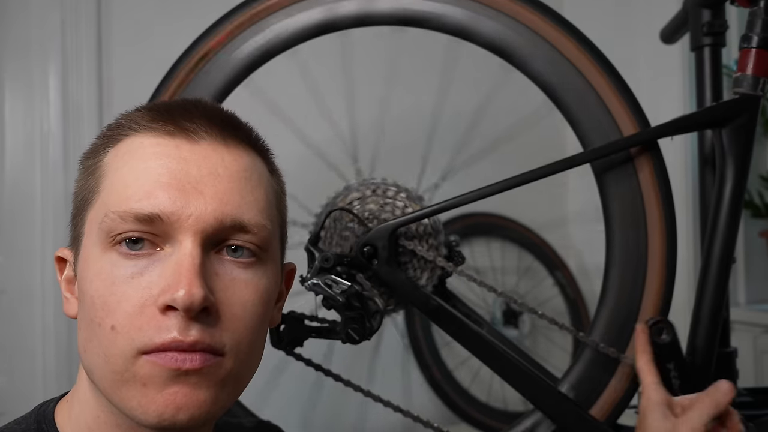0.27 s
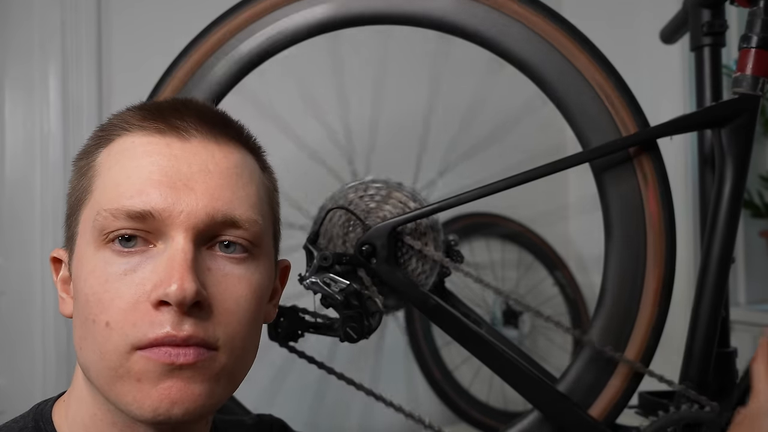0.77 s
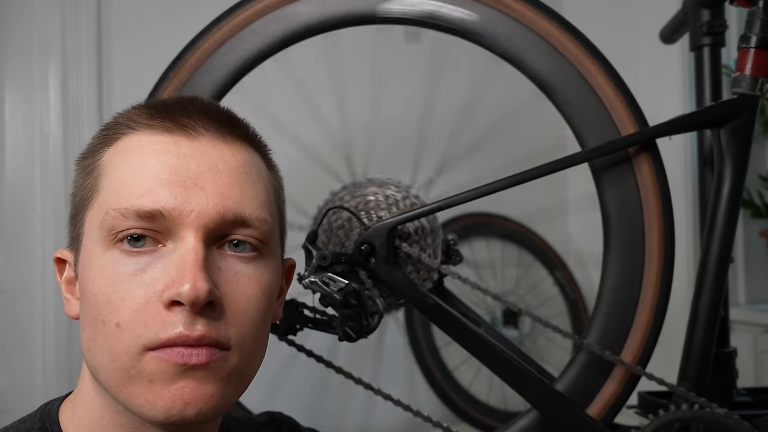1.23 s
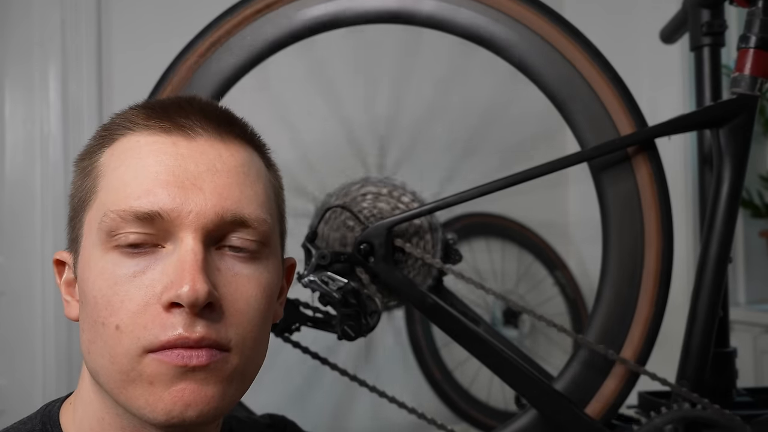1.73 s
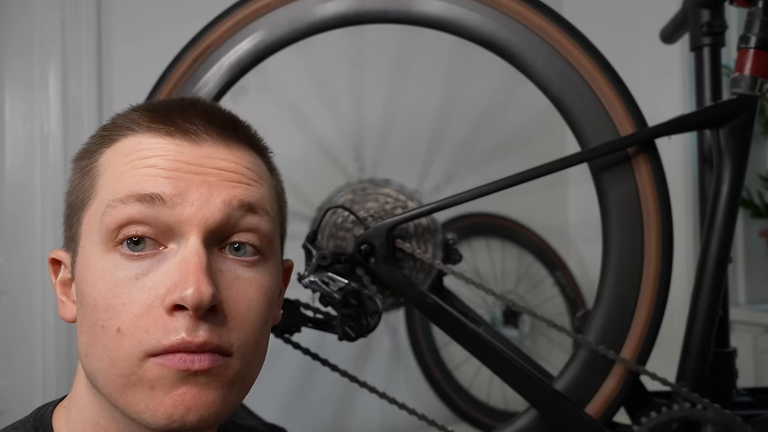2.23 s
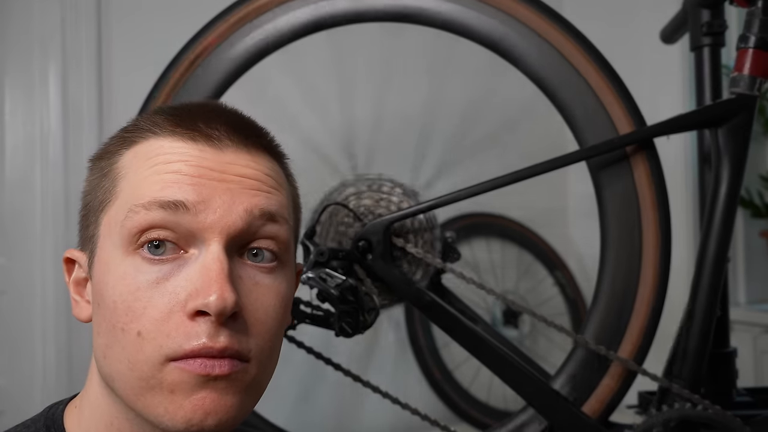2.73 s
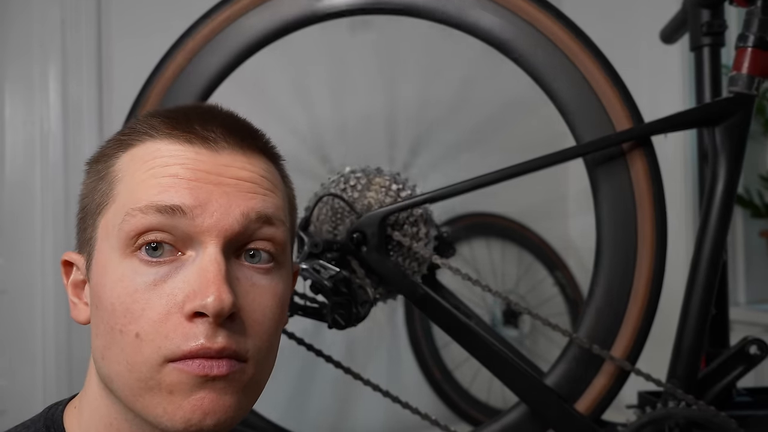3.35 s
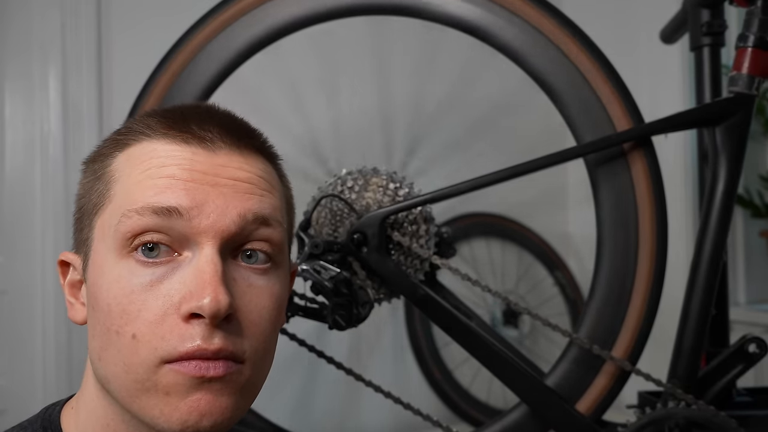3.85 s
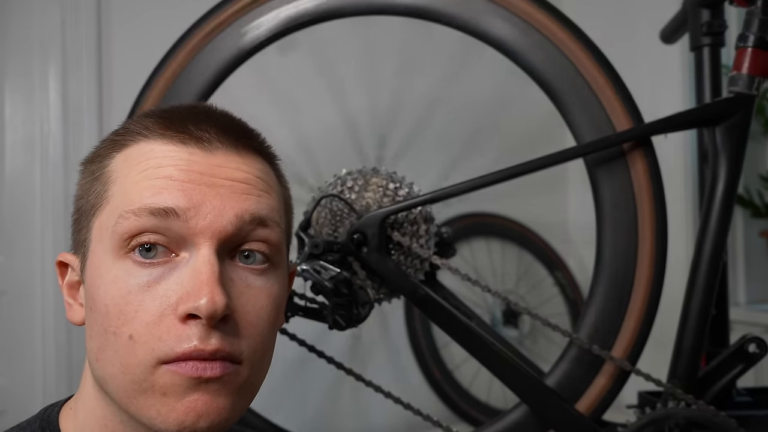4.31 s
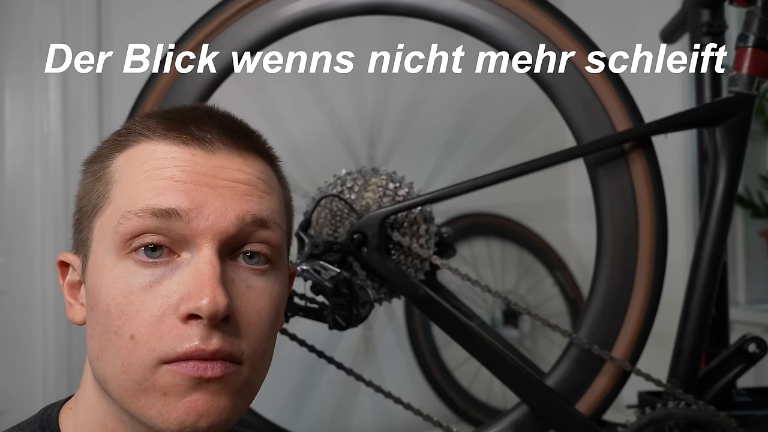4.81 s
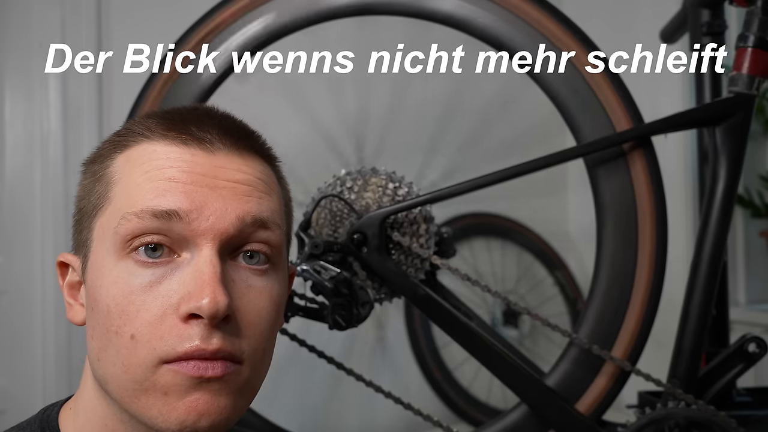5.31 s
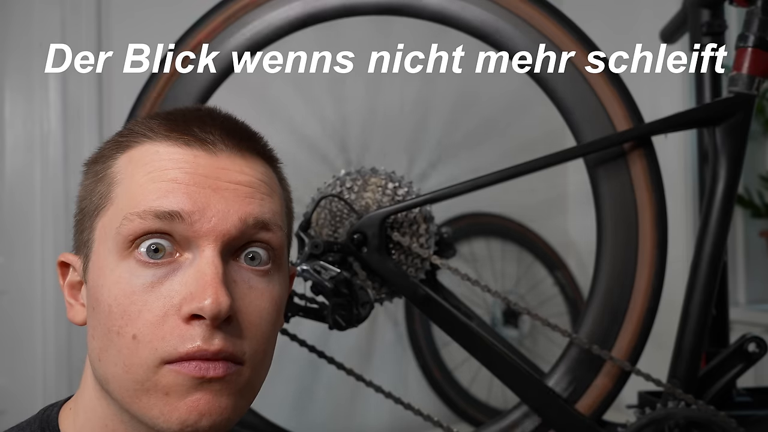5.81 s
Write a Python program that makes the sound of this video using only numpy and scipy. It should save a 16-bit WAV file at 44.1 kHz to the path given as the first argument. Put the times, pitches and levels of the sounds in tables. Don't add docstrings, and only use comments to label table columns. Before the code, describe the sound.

A close microphone hears a bicycle drivetrain in a still room. Tiny metallic ticks and dull frame bumps come first, then a loud clustered gear-shift clank with crisp cracks, a frame thud and loose-link shake dying quickly. The chain runs quietly again with irregular ticks. From three seconds, freehub pawls start slowly, speed up within moments, then buzz along as crisp separate clicks, slowing very slightly, with a short room echo.

```python
import sys
import numpy as np
from scipy import signal
from scipy.fft import rfft, irfft
from scipy.io import wavfile
from scipy.ndimage import uniform_filter1d

SR = 44100
rng = np.random.default_rng(int(sys.argv[2]) if len(sys.argv) > 2 else 0)


def dump(signal):
    limited = np.clip(np.atleast_2d(signal).T, -1, 1)
    pcm = np.round(limited * 32767).astype(np.int16)
    wavfile.write(sys.argv[1], SR, pcm)


def elevation(decibels):
    levels = np.asarray(decibels, float)
    return 10 ** (levels / 20)


N = 267687
KNOCK_SAMPLES = 4096

# pitch_hz, density_db_per_hz
AIR_SPECTRUM = [(12, -27.5), (20, 6), (181, -13.5), (220, -11.5), (566, -11.5), (651, -14.5), (935, -16),
                (1780, -18.5), (3190, -19.5), (5120, -23), (15600, -25)]
# pitch_hz, t60_s
ROOM_DECAY = [(100, 0.88), (300, 0.97), (700, 0.63), (1800, 0.62), (4800, 0.54), (12800, 0.5)]
# pitch_hz, density_db_per_hz
RUMBLE_SPECTRUM = [(47, -28.5), (80, -0.5), (150, -13.5), (182, 7.5), (244, -7), (394, 0), (668, -8.5),
                   (953, -8.5), (1060, -23.5), (1500, -19.5), (1950, -36.5), (3300, -120)]
# time_s, level_db
CRANK_EFFORT = [(0., -95), (.2, -78), (.26, -77), (.75, -78), (1.35, -69), (1.7, -75), (2.1, -71),
                (2.37, -72), (2.42, -68.5), (3.08, -69), (3.2, -72)]
# start_s, level_db
PEDAL_BUMPS = [(.085, -67), (.222, -57.5), (.76, -62), (2.16, -59), (2.4, -61.5), (2.83, -54)]
# pitch_hz, width_hz, level_db
FRAME_MODES = [(99, 10, -15), (203, 42, -26), (291.1, 91, -9), (354.7, 26, 5.5), (450, 180, -0.5),
               (560, 92, -2.5), (697, 140, -6), (790, 220, 0), (907, 80, 0), (1164, 140, -9.5)]
# pitch_hz, width_hz, level_db
SPROCKET_MODES = [(1228, 470, -9.5), (1570, 250, -7), (1870, 580, -4.5), (2277, 150, -1), (2577, 360, 2),
                  (3040, 400, -5.5), (3360, 130, 2), (3360, 1000, -1), (3730, 320, -4), (4180, 195, -5.5),
                  (5110, 240, -14)]
# start_s, ring_peak_db, pitch_hz, crack_db
LINK_TICKS = [(0.0662, -61.5, 3030, -76), (0.2249, -64, 2640, -65), (0.2338, -67, 2160, -62.5),
              (0.3062, -64.5, 2590, -75), (0.3434, -66, 2620, -75), (0.423, -71, 3110, -69),
              (0.458, -63, 3680, -66), (0.5444, -64, 2640, -70), (0.667, -66.5, 2640, -72),
              (0.7582, -66, 3550, -67), (1.4294, -65.5, 2608, -68), (1.828, -65.5, 3280, -74.5),
              (1.9095, -63.5, 2190, -72), (1.9496, -64, 2524, -71), (2.0892, -62, 2600, -76.5),
              (2.1784, -60, 3290, -72.5), (2.289, -68, 3460, -73), (2.3274, -61, 2600, -73),
              (2.4697, -67, 3010, -70), (2.5299, -59, 3240, -66), (2.5784, -62, 3100, -75),
              (2.701, -60.5, 3040, -76), (2.8818, -63, 2520, -71), (2.9622, -54.5, 3280, -59),
              (3.0285, -61.5, 3560, -73)]
# start_s, ring_peak_db, crack_db, thud_db
SHIFT_KNOCKS = [(.7930, -52.5, -54, -50), (0.7991, -37.5, -34, -37.5), (0.8052, -32, -34, -47.5),
                (0.8067, -21, -26.5, -32.5), (.8160, -28, -49, -33), (0.83, -22, -44, -29),
                (0.8361, -25, -43, -34), (0.8414, -28, -54.5, -36), (0.848, -34, -54.5, -31),
                (0.8858, -45, -42.5, -38), (0.902, -32.5, -54.5, -35), (.9480, -51, -56, -41),
                (1.018, -41.5, -62, -36), (1.061, -48.5, -57, -40.5), (1.1000, -64, -63, -53)]
# pitch_hz, density_db_per_hz
CHAIN_CRACK = [(2650, -24), (4500, -11), (5310, -18.5), (5960, -11.5), (6890, -9.5), (9420, -3.5),
               (10300, -7), (15600, -10.5)]
# pitch_hz, level_db, t60_s
SPOKE_RINGS = [(100.2, -58, 0.9), (188.4, -74.5, 2.5), (248, -54, 0.88), (294, -58.5, 0.41),
               (365.6, -44.5, 0.77), (363, -53, 0.72), (443.5, -51.5, 1.3), (472, -54.5, 1.2),
               (549, -54.5, 1.4), (560, -51.5, 1.6), (580, -57.5, 1.4), (820, -53.5, 0.91),
               (870, -64, 0.83), (1140, -63, 1.4)]
# pitch_hz, level_db, t60_s
DISC_RINGS = [(3030, -59.5, 1.3), (3040, -69, 1.1), (3371, -54.5, .5), (4193, -52.5, 0.33),
              (4260, -50.5, .4)]
# ring_db, crack_db, thud_db
SHAKE_START = (-37, -45.5, -39)
# ring_db_per_s, crack_db_per_s, thud_db_per_s
SHAKE_SLOPE = (-130., -94, -110.)
# pitch_hz, width_hz, level_db
HUB_MODES = [(1180, 210, -28), (1600, 120, -12), (2035, 200, -8), (2598, 128, -2.5), (2892, 570, -4.5),
             (3422, 545, -4), (3494, 666, -3.5), (3780, 190, 2.5), (4165, 390, -9), (4670, 990, -25.5),
             (5020, 33, -7.5), (5385, 63, -6)]
# pitch_hz, width_hz, level_db
PAWL_MODES = [(12100, 780, -13), (6400, 70, -1), (7100, 120, -14), (7800, 70, -2), (8650, 900, -13),
              (11650, 340, -6.5), (13800, 300, -7), (14800, 360, 1.5)]
# pitch_hz, density_db_per_hz
PAWL_CRACK_SPECTRUM = [(2650, -24), (4500, -5), (4840, -7.5), (5840, -8), (6720, -4), (11300, -3.5),
                       (12300, -7), (14200, -1), (15600, -8.5)]
# pitch_hz, width_hz, level_db
RIM_MODES = [(416, 27, -4), (439, 12, 6.5), (714, 101, 3), (803, 146, -3.5), (1212, 146, -0.5)]
# time_s, rate_teeth_per_s
RATCHET_SLIP = [
    (3.094, 14.879),
    (3.2216, 31.503),
    (3.2823, 43.556),
    (3.3974, 42.979),
    (3.4157, 41.066),
    (3.5351, 35.63),
    (6.07, 33.717),
]
# tooth_index, ring_db, crack_db
TOOTH_WEAR = [(0, -2.9, -2.3), (4, -2.1, .7), (6, -1.6, -1.), (11, 1.7, -.8), (13, -3.2, 0.), (14, -2., .1),
              (15, 2.2, -.3), (19, -2., -.3), (20, -2.2, -1.9), (24, 3.5, -.3), (25, 2.5, -.3),
              (26, -2., 1.1), (28, -2.2, 1.6), (29, 6., .4), (30, 3.1, 1.7), (31, -2.3, .9), (34, 1.9, .5),
              (35, .8, -2.2)]

RATCHET_TEETH = 36
SHELL_HZ, SHELL_WIDTH_HZ = 3760, 450
RING_DB, CRACK_DB, RIM_DB = -40.5, -37.5, -66


def evened(x):
    return x / np.sqrt(np.mean(x ** 2) + 1e-20)


def read(points, hz):
    f, value = np.transpose(points)
    return np.interp(np.log(hz + 1), np.log(f + 1), value)


def knock_hz():
    return np.fft.rfftfreq(KNOCK_SAMPLES, 1 / SR)


def flat(points):
    return elevation(read(points, knock_hz()))


def modes(table, count, scatter_db, drift=0.026):
    hz = knock_hz()
    size, turn, shift = rng.standard_normal((count, len(table), 3)).T[..., None]
    out = 0
    for k, (pitch_hz, width_hz, db) in enumerate(table):
        offset = (hz - pitch_hz * (1 + drift * shift[k])) / width_hz
        resonance = (1 + 2j * offset) ** -2
        out = out + elevation(db + scatter_db * size[k]) * np.exp(0.8j * turn[k]) * resonance
    bass_cut_hz = 85
    return out * (1j * hz / (bass_cut_hz + 1j * hz)) ** 3


def knocks(times_s, peak_db, response, rise_ms, fall_ms, lumpy_db, snap=0.6):
    ms = np.arange(KNOCK_SAMPLES) * 1000 / SR
    grain, lumps = rng.standard_normal((len(times_s), KNOCK_SAMPLES, 2)).transpose(2, 0, 1)
    lumps = evened(uniform_filter1d(lumps, size=24))
    envelope = (1 - np.exp(-ms / rise_ms)) * np.exp(-ms / fall_ms)
    burst = grain * elevation(lumpy_db * lumps) * envelope
    burst[:, round(rise_ms * SR / 1000)] += snap * np.linalg.norm(burst, axis=1)
    sound = irfft(rfft(burst) * response) * np.cos(np.pi / 2 * ms / ms[-1])
    peak = np.sqrt(uniform_filter1d(sound ** 2, size=88).max(1))
    sound = sound * (elevation(peak_db) / peak)[:, None]
    out = np.zeros(N + KNOCK_SAMPLES)
    for s, part in zip(times_s, sound):
        out[round(s * SR):][:KNOCK_SAMPLES] += part
    return out[:N]


def noise(points, patchy_db):
    a, b, patches = rng.standard_normal((N // 256 + 5, 513, 3)).T
    patches = uniform_filter1d(patches, size=5, axis=0)
    patches = evened(uniform_filter1d(patches, size=12, axis=1))
    colour_db = read(points, np.fft.rfftfreq(1024, 1 / SR))[:, None]
    z = (a + 1j * b) * elevation(colour_db + patchy_db * patches)
    return evened(signal.istft(z, nperseg=1024, noverlap=768)[1][:N])


def air():
    return elevation(-71.5) * noise(AIR_SPECTRUM, 0.6)


def room(x):
    taps = np.zeros((3, SR))
    at = np.arange(200, SR - 20, 20) + rng.integers(0, 20, (3, (SR - 201) // 20))
    np.put_along_axis(taps, at, rng.choice([-1., 1.], at.shape), 1)
    hz, t, z = signal.stft(taps, SR, nperseg=256)
    dull_db = -6 * hz / 10000
    decay_db = dull_db[:, None] - 60 * t / read(ROOM_DECAY, hz)[:, None]
    tail = signal.istft(z * elevation(decay_db), SR, nperseg=256)[1]
    tail = tail / np.linalg.norm(tail[0])
    phase = 3.4 * np.arange(N) / SR + np.arange(3)[:, None] / 3
    share = np.cos(np.pi * phase) * np.sqrt(2 / 3)
    return signal.fftconvolve(x * share, tail, axes=1)[:, :N].sum(0)


def chain():
    s, effort_db = np.transpose(CRANK_EFFORT)
    t = np.arange(N) / SR
    effort_db = np.interp(t, s, effort_db)
    contacts_per_s = 400
    contacts = rng.standard_normal(N) * (rng.random(N) < contacts_per_s / SR)
    ring = irfft(modes(SPROCKET_MODES, 1, 0)[0])
    rattle = evened(signal.oaconvolve(contacts, ring)[:N])
    rattle_db = -92 + 1.3 * (effort_db + 71)
    rumble = elevation(effort_db) * noise(RUMBLE_SPECTRUM, 2.0)
    running = np.clip((s[-1] - t) / 0.086, 0, 1)
    bump_s, bump_db = np.transpose(PEDAL_BUMPS)
    bumps = knocks(bump_s, bump_db - 8.0, modes(FRAME_MODES, len(bump_s), 3.4), 1.9, 6.5, 2.5)
    return bumps + running * (rumble + elevation(rattle_db) * rattle)


def ticks():
    s, ring_db, pitch_hz, crack_db = np.transpose(LINK_TICKS)
    link = (1 + 2j * (knock_hz() - pitch_hz[:, None]) / 200) ** -2
    response = link + elevation(-5.5) * modes(SPROCKET_MODES, len(s), 3.0, 0.03)
    ring = knocks(s, ring_db - 5.0, response, 0.58, 4.7, 3.0, snap=1.1)
    crack = knocks(s, crack_db + 2.5, flat(PAWL_CRACK_SPECTRUM), 0.54, 1.1, 3.0)
    return ring + crack


def shake(count=80):
    start_s, length_s, swell_s = 0.835, 0.465, 0.04
    place, size, sharp = rng.random((count, 3)).T
    age_s = length_s * (np.arange(count) + place) / count
    s = start_s + age_s
    ring_db, crack_db, thud_db = (db + slope * age_s for db, slope in zip(SHAKE_START, SHAKE_SLOPE))
    thud_db = thud_db + 20 * np.log10(np.clip(age_s / swell_s, 0.1, 1))
    ring = knocks(s, ring_db - 11.0 * size, modes(SPROCKET_MODES, count, 4.0, 0.057), 0.4, 0.88, 3.3)
    crack = knocks(s, crack_db - 11.0 * sharp, flat(CHAIN_CRACK), 0.35, 1.4, 3.0)
    thud = knocks(s, thud_db - 14.0 * size, modes(FRAME_MODES, count, 2.5, 0.033), 4.4, 1.3, 3.4)
    return ring + crack + thud


def sing(start_s):
    rings = SPOKE_RINGS + DISC_RINGS
    t = np.maximum(np.arange(N) / SR - start_s, 0)
    waver = rng.standard_normal((len(rings), N // 441 + 1))
    waver_db = 2.0 * evened(uniform_filter1d(waver, size=6))
    steps = np.arange(waver_db.shape[1]) * 441
    out = np.zeros(N)
    for (hz, db, t60_s), w in zip(rings, waver_db):
        level_db = db - 60 * t / t60_s + np.interp(np.arange(N), steps, w)
        out += elevation(level_db) * np.sin(2 * np.pi * hz * t)
    return out * (1 - np.exp(-t / 0.028))


def gear_change():
    s, ring_db, crack_db, thud_db = np.transpose(SHIFT_KNOCKS)
    ring = knocks(s, ring_db, modes(SPROCKET_MODES, len(s), 2.0, 0.008), 0.4, 3.0, 2.0, snap=1.5)
    crack = knocks(s, crack_db - 2, flat(CHAIN_CRACK), 0.5, 3.1, 2.5, snap=0.43)
    thud = knocks(s, thud_db - 3.5, modes(FRAME_MODES, len(s), 4.3, 0.028), 1.36, 6.6, 1.92)
    return ring + crack + thud + sing(s[5]) + shake()


def ratchet():
    s, rate = np.transpose(RATCHET_SLIP)
    t = np.arange(s[0], s[-1], 1 / SR)
    passed = np.cumsum(np.interp(t, s, rate)) / SR
    n = np.arange(int(passed[-1]) + 1)
    tooth = n % RATCHET_TEETH
    luck = rng.standard_normal((len(n), 3))
    off_centre_ms, three_sided_ms, lead_ms, jitter_ms = 0.48, 0.23, 0.5, 0.15
    turn = 2 * np.pi / RATCHET_TEETH
    late_ms = off_centre_ms * np.cos(turn * (n - 32.2))
    late_ms = late_ms + three_sided_ms * np.cos(turn * (n - 2.52) * 3)
    late_ms = late_ms + jitter_ms * luck[:, 0] - lead_ms
    wear_db = np.zeros((RATCHET_TEETH, 2))
    for worn_tooth, *db in TOOTH_WEAR:
        wear_db[worn_tooth] = db
    more_db = wear_db[tooth] + 0.5 * luck[:, 1:]
    return np.interp(n, passed, t) + late_ms / 1000, tooth, more_db.T


def freehub():
    s, tooth, (ring_db, crack_db) = ratchet()
    shell = np.exp(-((knock_hz() - SHELL_HZ) / SHELL_WIDTH_HZ) ** 2)
    hub = modes(HUB_MODES, RATCHET_TEETH, 1.8, 0.012)[tooth] * elevation(ring_db[:, None] * shell)
    ring = knocks(s, RING_DB + ring_db, hub, 0.35, 3.6, 0.45, snap=1.22)
    pawl = flat(PAWL_CRACK_SPECTRUM) + elevation(1.0) * modes(PAWL_MODES, RATCHET_TEETH, 0.84)[tooth]
    crack = knocks(s, CRACK_DB + crack_db, pawl, 0.7, 3.3, 1.2, snap=0.24)
    rim_db = np.full(len(s), RIM_DB)
    rim = knocks(s, rim_db, modes(RIM_MODES, len(s), 0.84), 0.75, 1.44, 1.5, snap=1.2)
    return ring + crack + rim


def scene():
    links, clack, hub = ticks(), gear_change(), freehub()
    wet = room(elevation(-7.5) * hub + elevation(-9.0) * clack + elevation(-5.0) * links)
    return (air() + chain() + links + clack + hub + wet)[None]


def low_pass(x):
    return signal.sosfilt(signal.butter(12, 16650, fs=SR, output="sos"), x)


def record(dry):
    edge_hz, top_hz, leak_db = 15850, 16600, -36
    low, top = (signal.firwin(801, hz, window=("kaiser", 9), fs=SR) for hz in (edge_hz, top_hz))
    band = low + elevation(leak_db) * (top - low)
    mix = signal.oaconvolve(dry, band[None], "same")
    return low_pass(mix)


dry = scene()
out = record(dry)
dump(out)
```